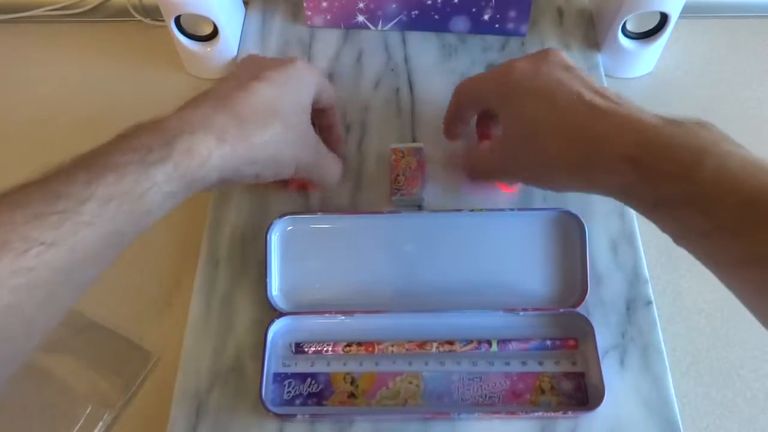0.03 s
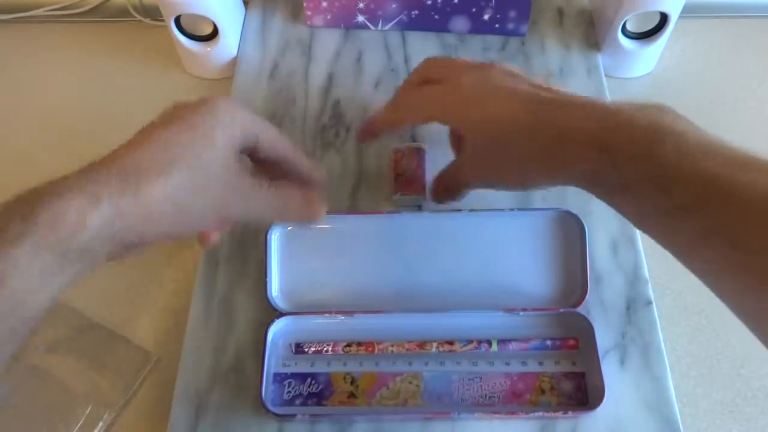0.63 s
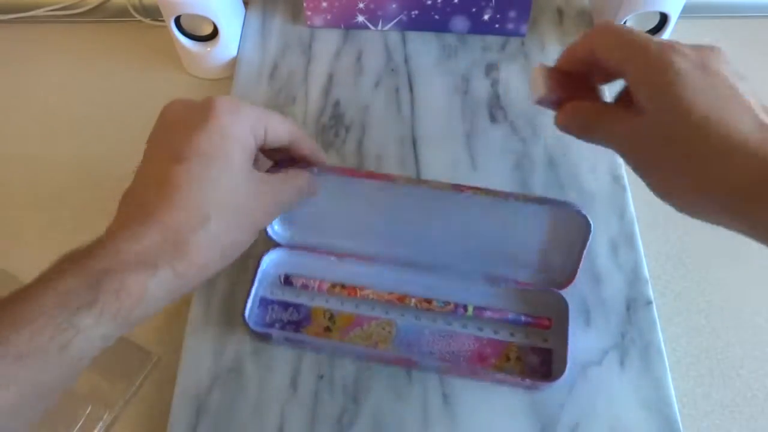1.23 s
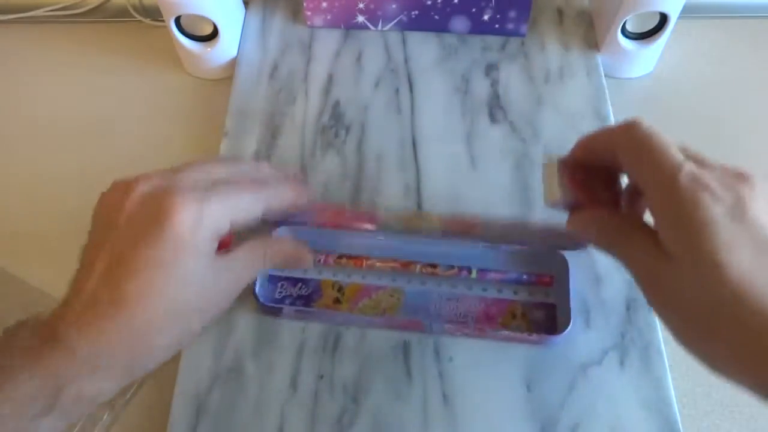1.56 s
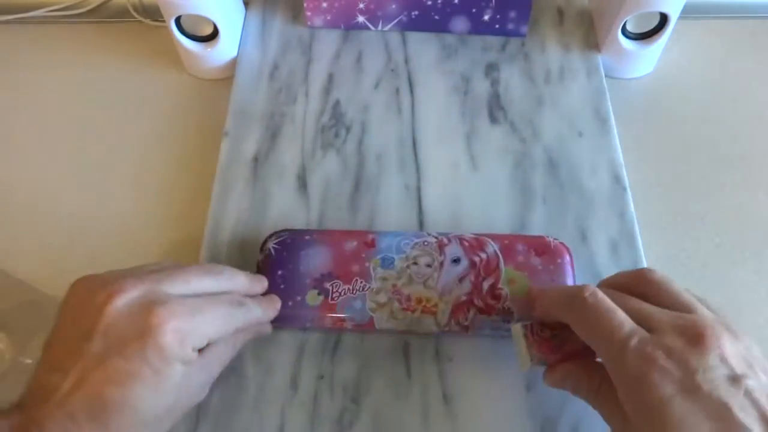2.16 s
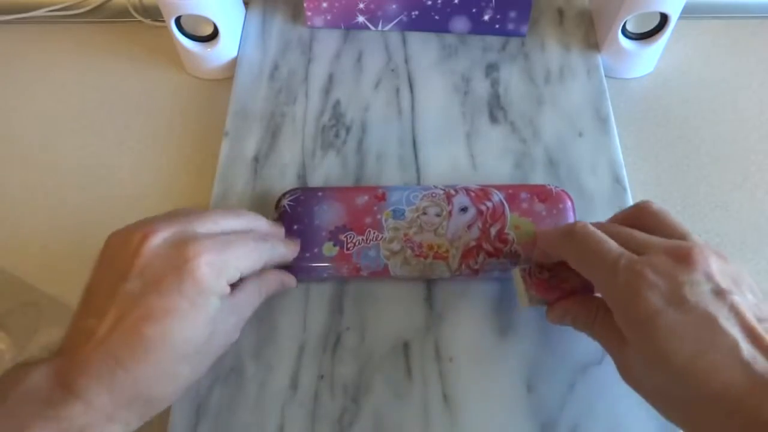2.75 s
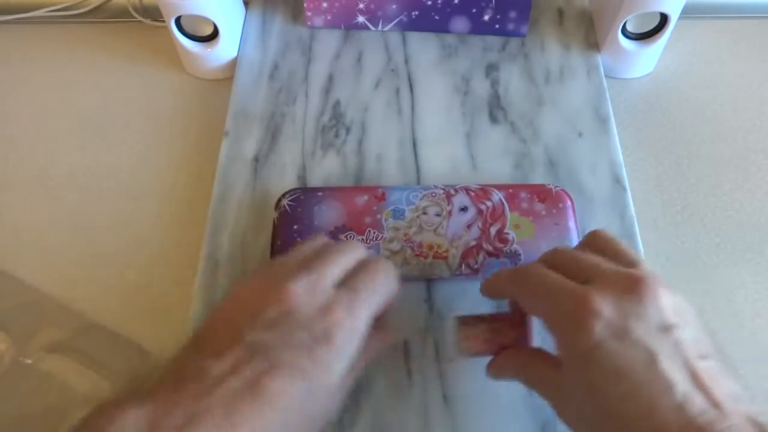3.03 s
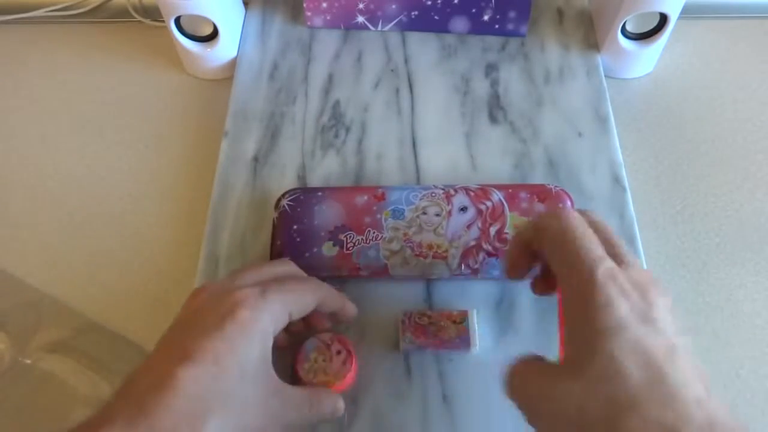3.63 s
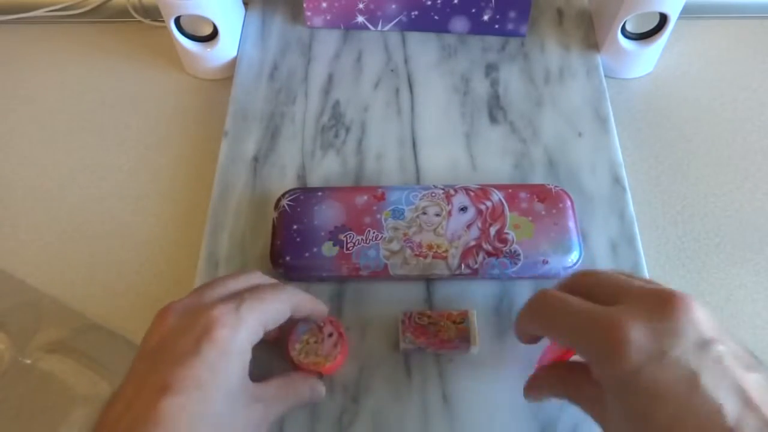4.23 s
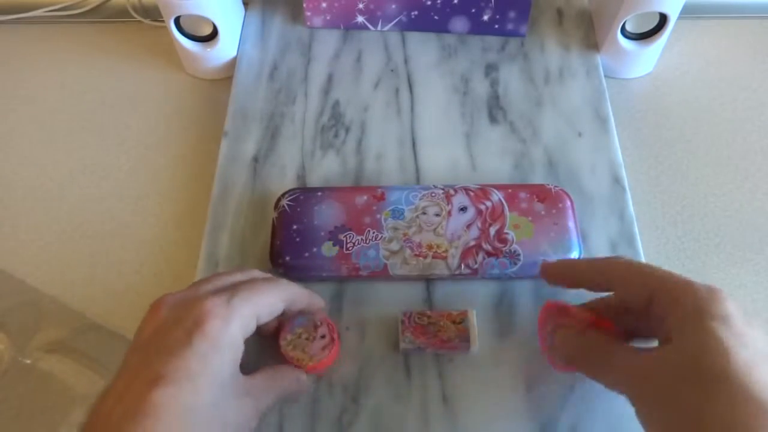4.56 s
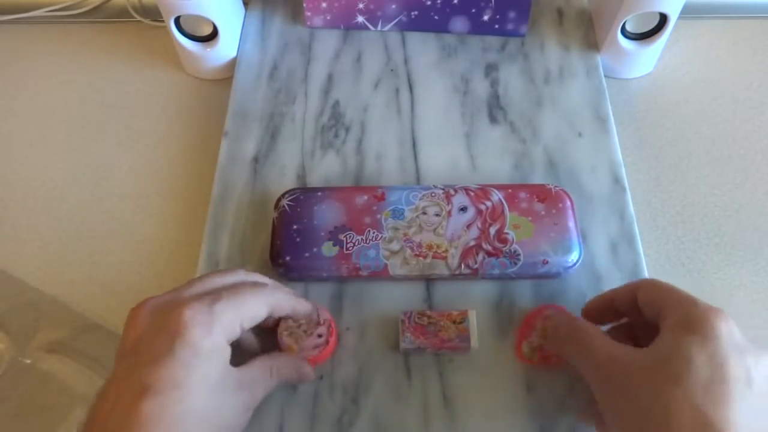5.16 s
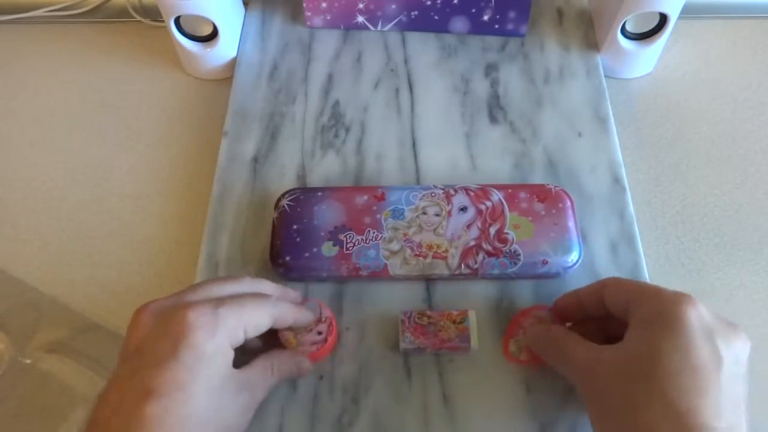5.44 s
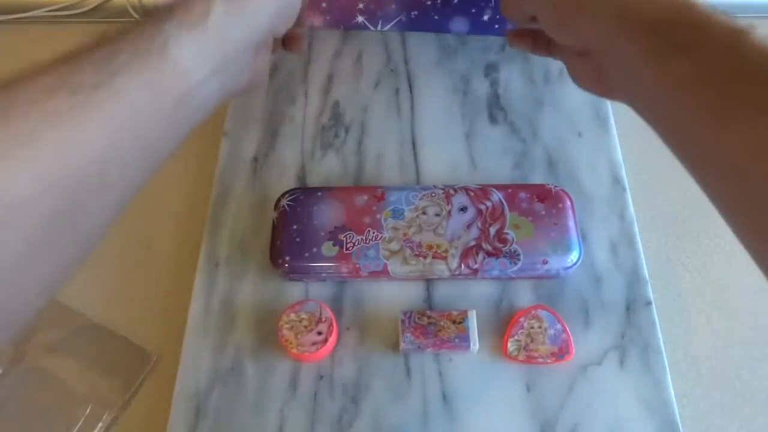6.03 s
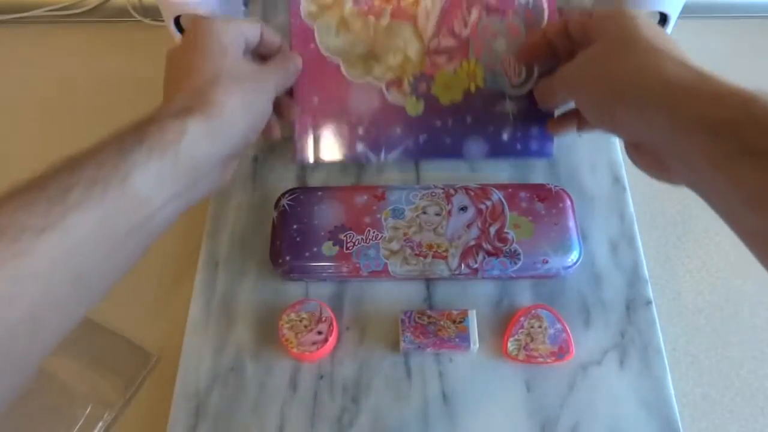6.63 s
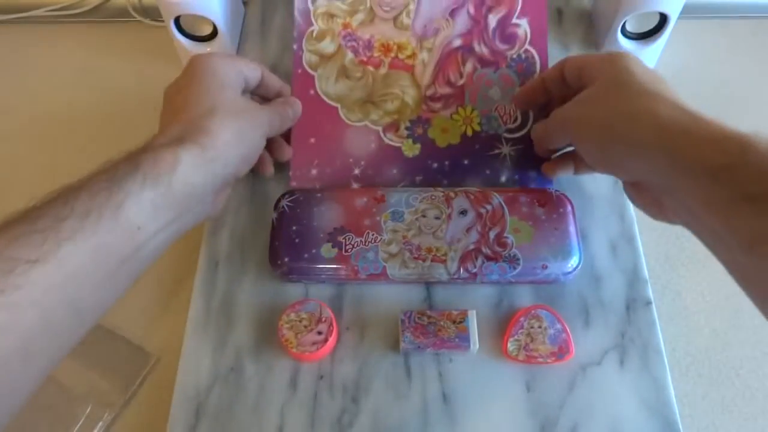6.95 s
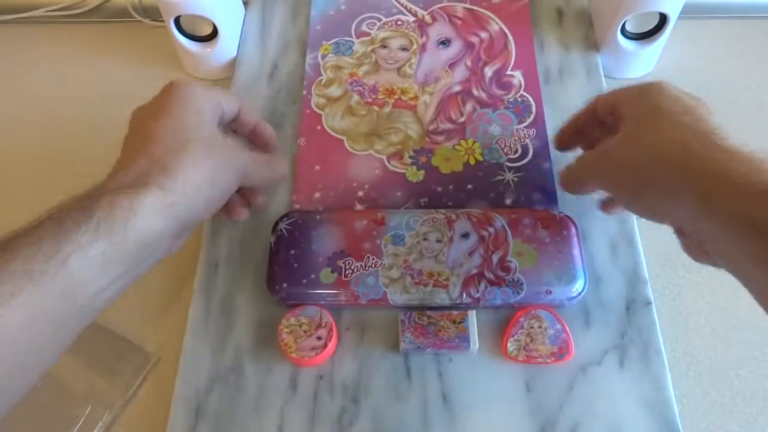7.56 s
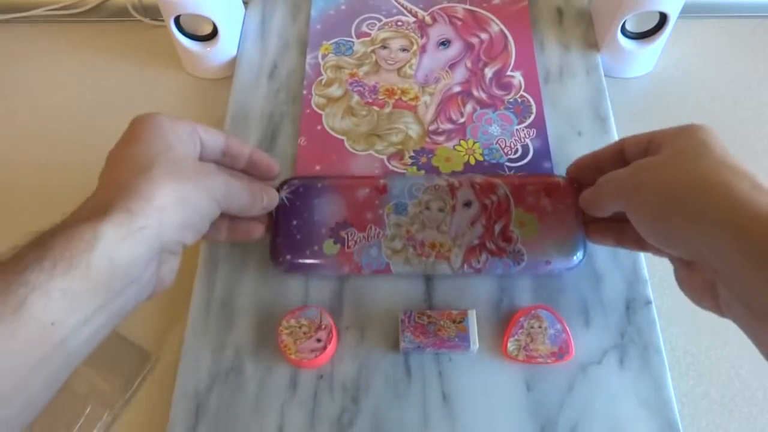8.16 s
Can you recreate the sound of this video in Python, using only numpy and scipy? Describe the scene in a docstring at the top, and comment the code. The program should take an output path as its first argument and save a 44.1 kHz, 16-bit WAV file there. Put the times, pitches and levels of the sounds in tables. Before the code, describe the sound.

A fan whines steadily in a small room, and a faint high electrical whistle comes and goes. Close by, fingers rub and tick softly. From about 1 second a tin pencil case knocks lightly and scrapes over a marble slab. It shuts with a ringing metallic clatter at 1.7 seconds, is pressed home with another at 2.1, then slides until a small knock near 2.9. From 3.3 to 3.6 a hollow plastic sharpener clatters on the stone, its pitch falling as it rocks to rest. A second sharpener clicks down at 4 seconds, with a short fingertip squeak at 4.4 and further clicks at 4.8 and 5.1. Around 6.4 a sheet of card taps and slides with a soft, fluttering hiss, nudging the tin at 7.4. The tin scrapes with a low drone and gives a last knock at about 8.3 seconds.

```python
"""A tin pencil case is slid over a marble slab, shut and pressed home: impacts excite its modes, and
friction makes it hiss and drone. Two plastic sharpeners clatter down beside it, their hollow shells
resonating, and a sheet of card is slid up until it nudges the tin. Fingers rub, tick and squeak.
The small room reverberates; a fan whines steadily as air noise drives its narrow resonances,
and a faint electrical whistle comes and goes."""
import sys
import numpy as np
from scipy import signal
from scipy.io import wavfile
from scipy.ndimage import uniform_filter1d

SR = 44100
rng = np.random.default_rng(int(sys.argv[2]) if len(sys.argv) > 2 else 0)


def put_to_file(sound):
    """Save the sound as 16-bit audio at rate SR, in the file named by the first command-line argument."""
    columns = np.atleast_2d(sound).T  # one column per channel
    safe = np.clip(columns, -1, 1)
    whole_steps = np.round(safe * 32767)
    wavfile.write(sys.argv[1], SR, whole_steps.astype(np.int16))


N = 370440
TAIL = np.arange(SR // 2) / SR  # time axis of one blow, in seconds

# Modes of the closed tin. Each row: frequency in Hz, level in dB, t60 (time to fall 60 dB) in seconds.
SHUT_TIN_MODES = [(540, -8, 0.41), (622, 4.5, 0.15), (662, 0, 0.2), (780, 4, 0.078), (900, -22, 0.15),
                  (920, 6.5, 0.13), (1028, -4, 0.21), (1183, -24, 0.14), (1298, 5, 0.12),
                  (1980, -2.5, 0.44), (2480, -17, 0.23), (3040, -5, 0.39), (3430, -10, 0.1)]
# Spectrum of a small, hard impact. Each row: frequency in Hz, level in dB.
CLACK_SPECTRUM = [(40, -39), (200, -35), (320, -13.5), (600, -5), (1200, 1), (1800, 1.5), (2600, 2.5),
                  (5200, 0.5), (7500, -8.5), (9500, -18.5), (16000, -21.5)]
# Spectrum of sliding friction. Each row: frequency in Hz, spectral density in dB.
SCRAPE_SPECTRUM = [(100, -19.5), (400, -15.5), (1000, 7.5), (1800, 1), (3000, 5.5), (4000, 3.5),
                   (5500, -0.5), (7500, -4.5), (10000, -6), (14000, -13), (16000, -9.5)]


def tin_knocks():
    """Impact excites free vibration: lid and tray rattle and ring, in new modes once the lid is down."""
    # Each row: start in seconds, level in dB, hardness as treble in dB, rattle length in seconds.
    knocks = [(.953, -36, -2, 0.026), (.988, -36, -4, 0.031), (1.454, -36.5, 5.5, 0.079),
              (1.549, -31, 10.5, 0.029), (1.713, -27.5, 0, 0.35), (1.736, -18, 2.5, 0.12),
              (1.749, -17.5, 0, 0.12), (1.769, -23.5, -12, 0.097), (1.966, -41, -6.5, 0.15),
              (2.05, -34, -2, 0.15), (2.067, -25.5, 7.5, 0.054), (2.071, -16.5, -9.5, 0.034),
              (2.090, -18.5, 0, 0.11), (2.098, -19, 0, 0.18), (2.120, -22, -3.5, 0.17),
              (2.599, -34, 8, 0.037), (2.847, -34.5, -7, 0.091), (7.401, -28.5, -18, 0.048),
              (7.451, -31.5, -14, 0.052), (8.040, -33, -2.5, 0.02), (8.279, -25, -7.5, 0.047),
              (8.283, -21, -16, 0.15)]
    # Each row: frequency in Hz, level in dB, t60 in seconds.
    open_modes = [(530.4, -7, 0.3), (722, 2, 0.11), (890, 1.5, 0.18), (1075, 5.5, 0.38), (1528, -11, 0.21),
                  (2035, -9, 0.29), (2660, -4, 0.19), (3600, -1, 0.16), (4670, -2.5, 0.2)]
    # Envelope of the dense finer modes. Each row: frequency in Hz, level in dB.
    fine_spectrum = [(40, -72), (200, -19.5), (400, -7.5), (600, -2), (1000, 4), (1700, 0), (2900, 1.5),
                     (4600, -1), (5600, -6), (9000, -9), (12000, -16), (16000, -18)]
    shut_s = 1.9
    out = np.zeros(N)
    for s, db, treble_db, rattle_s in knocks:
        freedom = np.clip(rattle_s / 0.09, .2, 1)  # a held tin neither rattles nor rings for long
        ring = amp(-3.5) * ringing(open_modes if s < shut_s else SHUT_TIN_MODES, freedom)
        force = blow(rattle_s, rise_s=0.00031, contact_s=0.0027)
        clash = body(force, curve(fine_spectrum))
        bass_db = 0.4 - 0.41 * treble_db  # softer blows favour the low modes
        add(out, s, touch(clash + ring, db, bass_db, treble_db))
    return out


def tin_sliding():
    """Forced vibration: friction on the marble hisses and drives the damped modes of the held tin."""
    # Each row: firmest push, build-up and run-out in seconds, relative hiss and drone in dB.
    drags = [(.96, 0.025, 0.4, -53, -55.5), (1.2, 0.35, 0.52, -46.5, -86), (1.44, 0.39, 0.084, -47, -84),
             (1.51, 0.075, 0.27, -55, -51), (2.33, 0.11, 0.17, -46.5, -45.5),
             (2.64, 0.15, 0.38, -49.5, -45), (2.87, 0.038, 0.031, -67, -37), (7.395, 0.13, 0.11, -41, -34),
             (7.91, 0.057, 0.045, -58.5, -45), (8.005, .04, 0.026, -78, -32.5),
             (8.055, 0.042, 0.071, -61, -38.5), (8.26, 0.34, 0.065, -65, -47.5)]
    # The drive favours the low modes. Each row: frequency in Hz, level in dB.
    drive_spectrum = [(60, -50), (200, -19), (400, -15), (650, 2.5), (900, 1.5), (1400, -12), (3000, -12),
                      (8000, -40.5)]
    slips = friction(grain_db=5.5, judder_db=2.5, ring=1.0)
    hiss = amp(3.0) * body(slips, curve(SCRAPE_SPECTRUM))
    drive = body(slips, curve(drive_spectrum))
    response = signal.fftconvolve(drive, ringing(SHUT_TIN_MODES, freedom=.3))[:N]
    drone = amp(-1.5) * drive + unit_rms(response)
    return hiss * strokes(drags, column=3) + amp(-4.0) * drone * strokes(drags, column=4)


def round_sharpener():
    """Cavity resonance: as the shell rocks to rest, its hollow closes on the stone and the note falls."""
    # Each row: start in seconds, level in dB.
    clacks = [(3.257, -23), (3.3115, -17), (3.324, -17.5), (3.333, -18.5), (3.344, -21), (3.356, -20),
              (3.370, -20.5), (3.380, -19), (3.390, -17.5), (3.414, -24), (3.4416, -15.5), (3.463, -23),
              (3.484, -16), (3.499, -24), (3.527, -15), (3.549, -21), (3.571, -27.5), (3.729, -35)]
    # From edge to rim to lying flat. Each row: time in seconds, cavity pitch in Hz,
    # then bass, treble and shell ring in dB.
    settling = [(3.257, 3200, 4.5, 10.5, 1.5), (3.311, 3320, -6.5, 6, -6), (3.527, 2320, -9, -2, -9),
                (3.549, 1420, 3, -3, -16), (3.729, 1470, 7.5, -23, -30)]
    # Each row: frequency in Hz, level in dB, t60 in seconds.
    shell_modes = [(2440, -4.5, 0.11), (3240, -12, .07), (4690, -6, .06), (5750, -10, 0.065),
                   (6040, -1, 0.032)]
    out = np.zeros(N)
    times, *columns = np.transpose(settling)
    for s, db in clacks:
        hz, bass_db, treble_db, ring_db = (np.interp(s, times, column) for column in columns)
        force = blow(rattle_s=0.044, rise_s=0.00012, contact_s=0.0023)
        clack = body(force, peaked_clack(hz, peak_db=9.0, width=0.11))
        ring = amp(ring_db) * ringing(shell_modes)
        add(out, s, touch(clack + ring, db, bass_db, treble_db))
    return out


def heart_sharpener():
    """Damped resonance: a heart-shaped plastic shell strikes the stone and rings briefly."""
    # Each row: start in seconds, relative level, bass and treble in dB, rattle length in seconds.
    clacks = [(4.0068, -19.5, -2.5, -5, 0.04), (4.027, -26.5, -0.5, -10, 0.05),
              (4.045, -23.5, 5, -14, 0.037), (4.8272, -28, 5, 6.5, 0.025), (5.1228, -28, 1, 14.5, 0.11),
              (5.134, -27, -1.5, 1, 0.055)]
    # Each row: frequency in Hz, width in Hz, level in dB.
    resonances = [(902, 87, 0), (1040, 60, -5), (1698, 46, -3), (2470, 520, -8), (2860, 110, -0.5),
                  (3620, 145, 0), (4030, 89, -3.5), (5500, 260, -4), (5755, 220, 0.5), (7200, 200, -29),
                  (9300, 770, -22)]
    # Envelope of the dense finer modes. Each row: frequency in Hz, level in dB.
    fine_spectrum = [(40, -63), (250, -32), (600, -17.5), (1400, -13), (1900, -18.5), (3200, -13),
                     (5000, -10.5), (8000, -21.5), (16000, -37)]
    power = amp(curve(fine_spectrum)) ** 2
    for hz, width, db in resonances:
        power += amp(db) ** 2 / (1 + (2 * (bins() - hz) / width) ** 2) ** 1.94
    out = np.zeros(N)
    for s, db, bass_db, treble_db, rattle_s in clacks:
        force = blow(rattle_s, rise_s=0.000067, contact_s=0.0029)
        clack = body(force, 10 * np.log10(power))
        add(out, s, touch(clack, db + 3.5, bass_db, treble_db))
    return out


def card_sliding():
    """Sliding friction hisses on the marble and shakes the sheet into a low flutter."""
    # Each row: firmest push, build-up and run-out in seconds, relative hiss and flutter in dB.
    pushes = [(6.45, 0.15, 0.18, -41, -75), (6.75, 0.34, 0.28, -45, -47), (7.1, 0.95, 0.17, -56, -67),
              (7.52, 0.77, 0.12, -51, -67)]
    # Each row: frequency in Hz, level in dB.
    flutter_spectrum = [(40, -24), (120, -31), (220, -17), (320, 7), (450, -2), (800, 6.5), (1400, -10),
                        (3000, -18)]
    hiss = amp(3.5) * body(friction(grain_db=4.5, judder_db=1.9), curve(SCRAPE_SPECTRUM))
    flutter = amp(4.0) * body(friction(grain_db=-4, judder_db=3.3), curve(flutter_spectrum))
    return hiss * strokes(pushes, column=3) + flutter * strokes(pushes, column=4)


def skin_rubs():
    """Friction of soft skin on the things held gives a scrape with a weakened middle range."""
    # Each row: firmest push, build-up and run-out in seconds, relative level in dB.
    rubs = [(.115, 0.26, 0.12, -51.5), (.47, 0.36, 0.33, -55.5), (.85, 0.38, 0.16, -58.5),
            (3.8, 1, 0.94, -62), (4.38, 0.068, 0.53, -58), (4.8, .2, 1, -57), (5.1, 0.049, 0.2, -50),
            (5.44, 0.089, 0.15, -60)]
    # Each row: frequency in Hz, gain in dB.
    skin_dip = [(700, 2.5), (1700, 0), (3000, -1), (5000, 3)]
    scrape = body(friction(grain_db=0.5, judder_db=3.0), curve(SCRAPE_SPECTRUM) + curve(skin_dip))
    return amp(1.5) * scrape * strokes(rubs, column=3)


def ticks():
    """Brief contacts are broadband: fingers and card edges catch, the harder with less bass."""
    # Each row: start in seconds, level in dB, treble in dB, length in seconds, pitch in Hz.
    catches = [(.389, -49, 19, 0.024, 4940), (0.63, -45, 9, 0.017, 5200), (0.699, -54, 23, 0.0069, 8500),
               (2.981, -53, 18, 0.012, 6400), (3.074, -56, 24.5, .013, 8100), (3.193, -46, 12, 0.013, 3500),
               (4.331, -41, 0, .053, 1720), (4.537, -37, 11, 0.028, 9200), (5.37, -50, 15, 0.028, 5470),
               (5.555, -51, -31, 0.049, 1610), (6.258, -54.5, -7, 0.044, 2530),
               (6.432, -26, -6.5, 0.067, 1320), (6.498, -34, 6, 0.092, 1310)]
    out = np.zeros(N)
    for s, db, treble_db, length_s, hz in catches:
        force = blow(length_s, rise_s=0.067 * length_s, contact_s=0.19 * length_s)
        tick = body(force, peaked_clack(hz, peak_db=11.5, width=0.18))
        add(out, s, touch(tick, db, bass_db=-0.27 * treble_db, treble_db=treble_db))
    return out


def squeaks():
    """Stick-slip oscillation: fingertips on stone give a harmonic tone of unsteady pitch."""
    # Each row: start in seconds, level in dB, pitch in Hz, length in seconds.
    slips = [(.06, -40.5, 2493, 0.046), (3.773, -41.5, 2584, 0.027), (4.411, -31, 2400, 0.025),
             (5.329, -49, 1874, 0.033)]
    out = np.zeros(N)
    for s, db, hz, length_s in slips:
        samples = int(np.ceil(length_s * SR))
        jitter = unit_rms(uniform_filter1d(rng.standard_normal(samples), size=40))
        turns = np.cumsum(hz * (1 + 0.057 * jitter)) / SR
        tone = sum(np.sin(2 * np.pi * k * turns) / k ** 2.13 for k in range(1, 6))
        add(out, s, amp(db) * unit_rms(tone) * np.hanning(samples))
    return out


def bumps():
    """Soft impacts of hands and card on the slab build slowly and put their energy in a low band."""
    # Each row: start in seconds, level in dB, pitch in Hz, t60 in seconds.
    thuds = [(0.364, -66.5, 125, 0.066), (1.737, -46, 155, 0.2), (2.851, -45.5, 350, 0.12),
             (2.866, -37, 626, .07), (5.529, -54.5, 397, 0.56), (6.399, -57.5, 135, 0.24),
             (6.433, -42, 550, 0.16), (6.50, -58, 129, 0.13)]
    out = np.zeros(N)
    for s, db, hz, t60 in thuds:
        band_db = -30 * np.log10(1 + ((bins() - hz) / (0.16 * hz)) ** 2).clip(0, 3)
        add(out, s, amp(db) * body(blow(t60, rise_s=0.011, contact_s=0.007), band_db))
    return out


def fan():
    """Narrow resonances filter air noise into a fuzzy whine, louder at first, that wavers."""
    # Each row: frequency in Hz, width in Hz, level in dB.
    resonances = [(992.1, 29.4, -46.5), (1136.7, 30, -52), (1064, 27, -56.5), (1016, 160, -52),
                  (2346, 290, -60), (2950, 390, -65.5), (3360, 120, -66.5)]
    hz, whine = np.fft.fftfreq(N, 1 / SR), np.zeros(N)
    for centre, width, db in resonances:
        spectrum = np.fft.fft(rng.standard_normal(N)) / (1 + (2 * (hz - centre) / width) ** 2) ** 1.04
        band = np.fft.ifft(spectrum)
        whine += amp(db) * unit_rms(band.real / (abs(band) + 1e-9) ** 0.04)  # slightly evens its strength
    easing_db = 5 * np.exp(-np.arange(N) / SR / 0.49)
    swell_db = 0.96 * drift(size=round(0.32 * SR))
    draught_db = 2.2 * drift(size=1500)
    return whine * amp(easing_db + swell_db + draught_db)


def electrical_whistle():
    """Frequency modulation: two thin, unsteady tones arch up and back together, fading in and out."""
    # Each row: midpoint in seconds, level in dB.
    bouts = [(-.02, -58), (2.52, -59), (5.031, -67), (8.15, -59.5)]
    bout_s, low_hz, rise_hz = .78, 12280, 1700
    arch, gain = np.zeros(N), np.zeros(N)
    for s, db in bouts:
        bout = np.maximum(1 - (2 * (np.arange(N) / SR - s) / bout_s) ** 2, 0)
        arch += bout
        gain += amp(db) * np.sqrt(bout)
    waver = 1 + .005 * drift(size=80) + .016 * drift(size=2500)
    turns = np.cumsum((low_hz + rise_hz * arch) * waver) / SR
    tones = (np.sin(2 * np.pi * ratio * turns) for ratio in (1, 1.07))
    return gain * sum(unit_rms(amp(7.2 * drift(size=1400)) * tone) for tone in tones)


def background():
    """Partial coherence: fan and room hush are mostly common to both ears."""
    # Each row: frequency in Hz, spectral density in dB.
    hush_spectrum = [(25, -13), (100, -19.5), (240, 2), (500, -0.5), (700, 12), (1300, 16.5), (1900, -5),
                     (3000, 6.5), (4200, -9), (7000, 0.5), (10500, -17.5), (16000, -11)]
    common, apart = (fan() + amp(-59.5) * body(rng.standard_normal(N), curve(hush_spectrum))
                     for _ in range(2))
    return common * amp([[.7], [-.7]]) + amp(-7.5) * apart * np.array([[1], [-1]])


def room_response():
    """Reverberation: dense reflections decay exponentially, each band at its own rate."""
    # Each row: frequency in Hz, t60 in seconds.
    decay_times = [(150, 0.51), (500, 0.27), (1400, 0.26), (4000, 0.2), (10000, 0.18), (16000, 0.079)]
    reflections = rng.standard_normal(len(TAIL)) * (rng.random(len(TAIL)) < .15)
    hz, t, bands = signal.stft(reflections, SR, nperseg=256)
    decay = np.exp(-np.log(1000) * t / curve(decay_times, hz)[:, None])
    tail = signal.istft(bands * decay, SR, nperseg=256)[1][:len(TAIL)]
    tail *= np.clip(TAIL / 0.0015 - 1, 0, 1)  # reflections arrive after the direct sound
    return tail / np.linalg.norm(tail)


def blow(rattle_s, rise_s, contact_s):
    """Contact force rises, chatters while the surfaces meet, then decays exponentially."""
    dying = np.exp(-np.log(1000) * np.maximum(TAIL - contact_s, 0) / max(rattle_s, .003))
    return rng.standard_normal(len(TAIL)) * dying * (1 - np.exp(-TAIL / rise_s))


def ringing(modes, freedom=1):
    """Superposition of damped modes; freedom below one adds damping, as a gripping hand does."""
    hz, db, t60 = np.transpose(modes)[:, :, None]
    decay = np.exp(-np.log(1000) * TAIL / (t60 * freedom))
    ring = amp(db) * decay * np.sin(2 * np.pi * (hz * TAIL + rng.random(hz.shape)))
    return ring.sum(0) / np.linalg.norm(amp(db)) * (1 - np.exp(-TAIL / 0.001))


def friction(grain_db, judder_db, ring=0):
    """Friction is many tiny slips, clumped as the hand judders; ring adds a hard body's fine modes."""
    grains = np.minimum(uniform_filter1d(rng.exponential(1, N), size=3), 4)
    slips = rng.standard_normal(N) * amp(grain_db * grains + judder_db * drift(size=500))
    fine_modes = rng.standard_normal(len(TAIL)) * np.exp(-TAIL / 0.0051)
    return unit_rms(unit_rms(slips) + ring * unit_rms(signal.fftconvolve(slips, fine_modes)[:N]))


def strokes(rows, column):
    """Gain from one dB column: strokes add in power, each 20 dB down a build-up or run-out away."""
    t = np.arange(0, N, 32) / SR
    power = np.zeros(len(t))
    for row in rows:
        s, build_s, run_out_s = row[:3]
        away = np.maximum((s - t) / build_s, (t - s) / run_out_s)
        power += amp(row[column] - 20 * away ** 1.39) ** 2
    return np.interp(np.arange(N) / SR, t, np.sqrt(power))


def touch(sound, db, bass_db, treble_db):
    """Contact shapes the spectrum: a flat blow brings out low body tones, a hard edge the treble."""
    tilt = [(150, 0.0039), (600, bass_db), (1000, bass_db), (1900, 0), (4200, 0), (9000, treble_db)]
    return amp(db) * colour(sound, curve(tilt))


def peaked_clack(hz, peak_db, width):
    """The impact spectrum in dB with one resonance raised; width is a share of its pitch."""
    return curve(CLACK_SPECTRUM) + peak_db / (1 + ((bins() - hz) / (width * hz)) ** 2)


def body(x, db):
    """Filtering at unit mean power gain."""
    return colour(x, db - 10 * np.log10(np.mean(amp(db) ** 2)))


def colour(x, db):
    """Minimum-phase filter with the given gain in each bin."""
    log_gain = np.log(amp(np.concatenate([db, db[-2:0:-1]])))
    taps = np.fft.ifft(np.exp(np.conj(signal.hilbert(log_gain)))).real
    return signal.fftconvolve(x, taps)[:len(x)]


def curve(points, hz=None):
    """Interpolation on a log-frequency axis, by default at the filter bins."""
    f, value = np.transpose(points)
    return np.interp(np.log((bins() if hz is None else hz) + 1), np.log(f + 1), value)


def bins():
    """Filter bin frequencies in Hz."""
    return np.fft.rfftfreq(4096, 1 / SR)


def drift(size):
    """Smoothed noise of unit rms; size is its memory in samples."""
    return unit_rms(uniform_filter1d(uniform_filter1d(rng.standard_normal(N), size), size))


def unit_rms(x):
    """Scales to an rms of one."""
    return x / np.sqrt(np.mean(x ** 2) + 1e-20)


def amp(db):
    """Decibels to gain."""
    return 10 ** (np.asarray(db) / 20)


def add(mix, s, sound):
    """Superposes a sound at s seconds."""
    part = mix[round(s * SR):][:len(sound)]
    part += sound[:len(part)]


def scene():
    """Level differences place the things close in front; reflections spread them, least in the treble."""
    # Each row: sound, left minus right level in dB.
    sources = [(tin_knocks(), -.6), (round_sharpener(), -.9), (heart_sharpener(), -.7),
               (skin_rubs() + ticks() + squeaks() + bumps(), .1), (tin_sliding() + card_sliding(), .2)]
    direct = sum(x * amp([[pan_db / 2], [-pan_db / 2]]) for x, pan_db in sources)
    mid, side = (signal.fftconvolve(direct.mean(0), room_response())[:N] for _ in range(2))
    side = colour(side, curve([(200, -14), (1000, -12.5), (5000, -15.5), (13000, -32)]))
    return direct + amp(-5.5) * mid + side * np.array([[1], [-1]]) + background() + electrical_whistle()


def record(dry):
    """Soft saturation rounds the loudest peaks; filters remove the deep bass and the highest treble."""
    ceiling, low_cut_hz, high_cut_hz = .7, 60, 15900
    rounded = ceiling * np.tanh(dry / ceiling)
    thin = signal.sosfilt(signal.butter(2, low_cut_hz, "highpass", fs=SR, output="sos"), rounded)
    return signal.oaconvolve(thin, signal.firwin(511, high_cut_hz, window=("kaiser", 9), fs=SR)[None], "same")


dry = scene()
out = record(dry)
put_to_file(out)
```